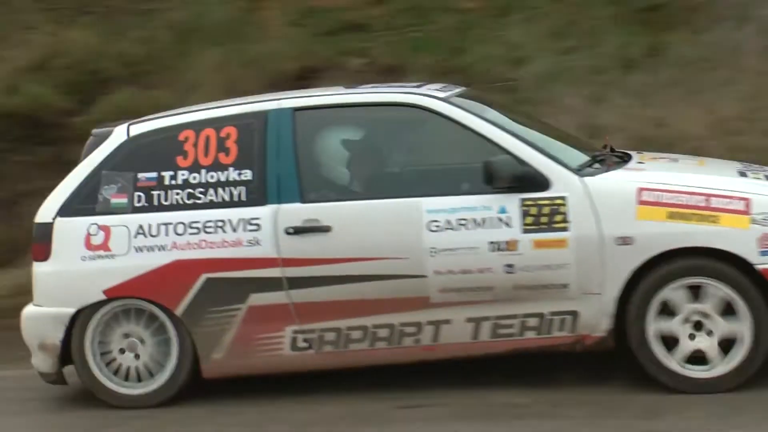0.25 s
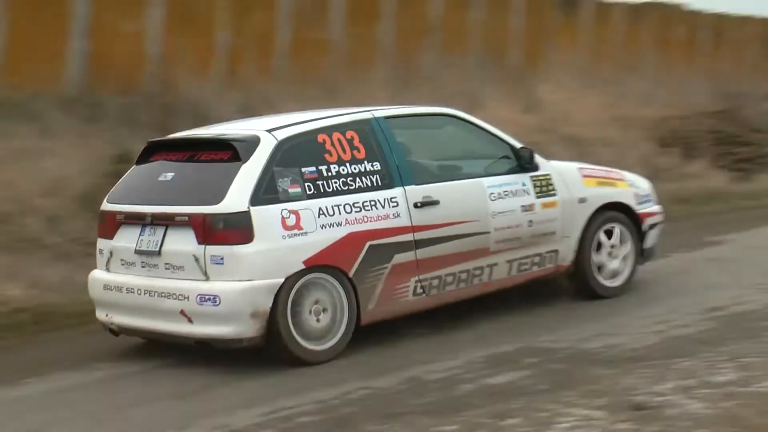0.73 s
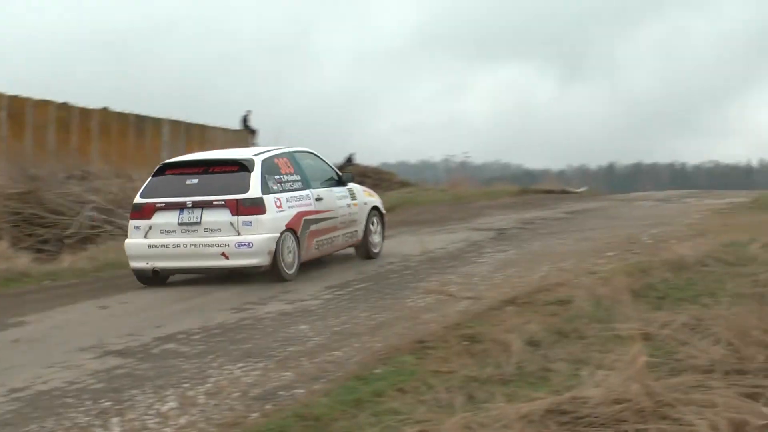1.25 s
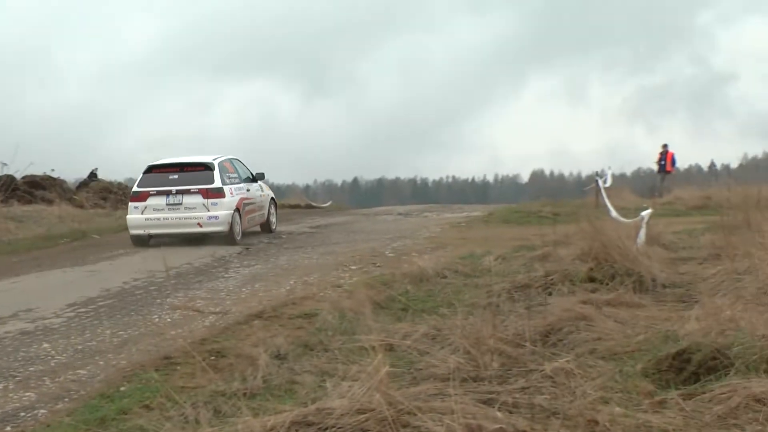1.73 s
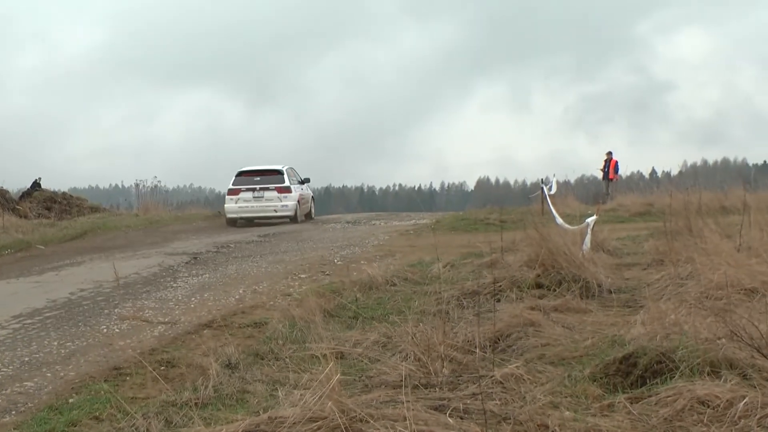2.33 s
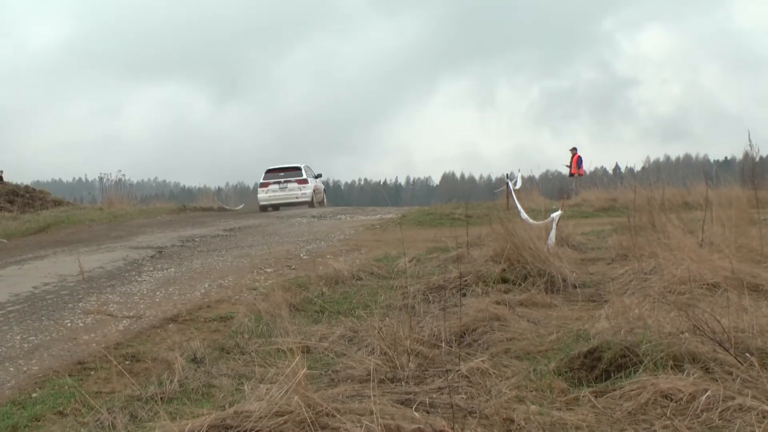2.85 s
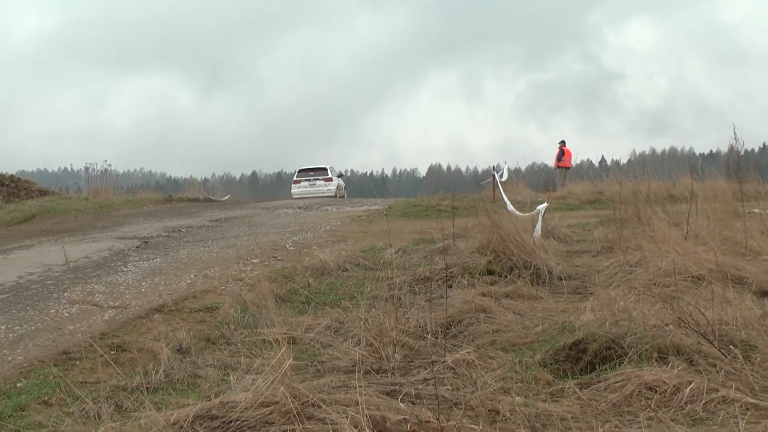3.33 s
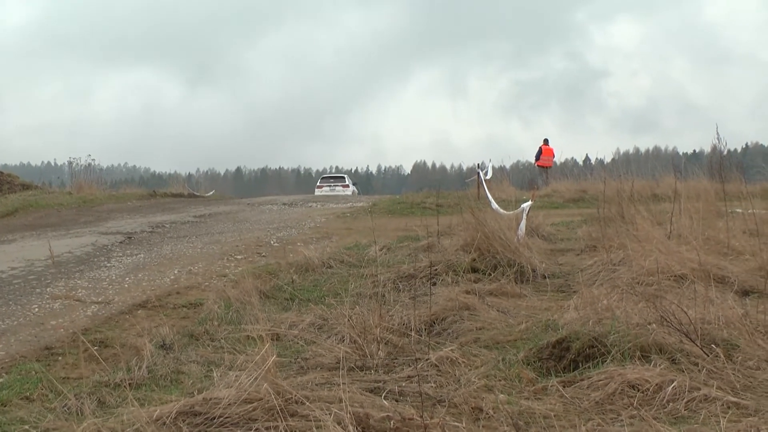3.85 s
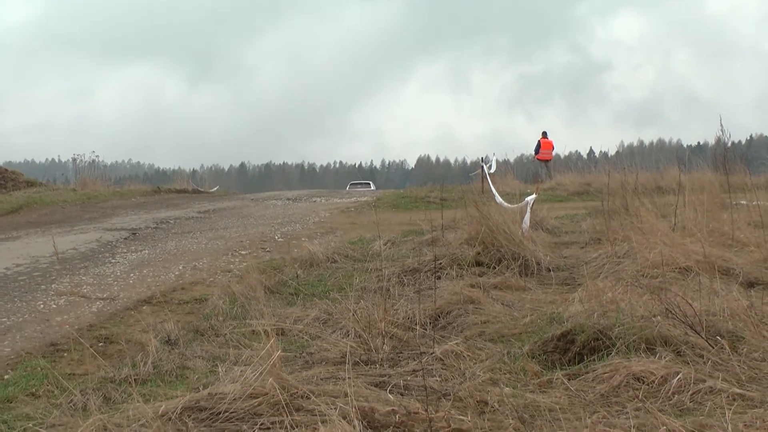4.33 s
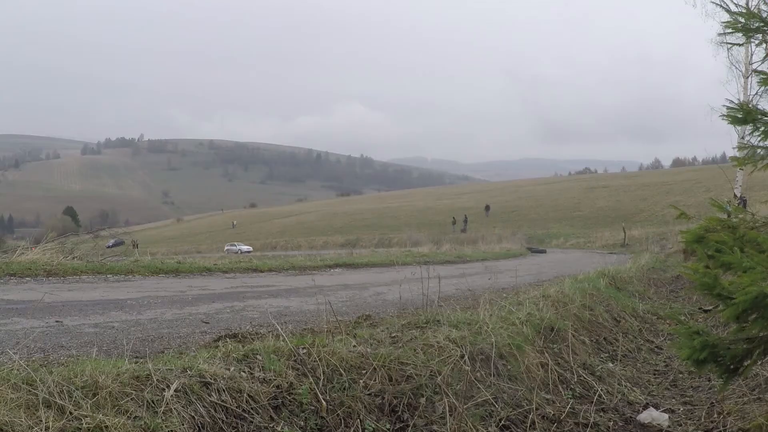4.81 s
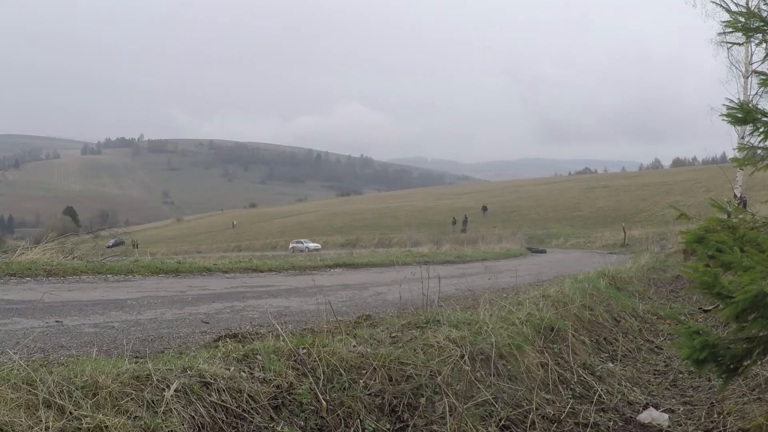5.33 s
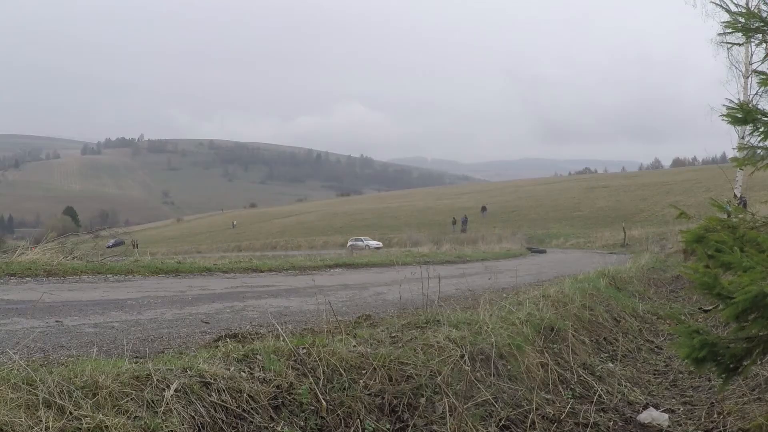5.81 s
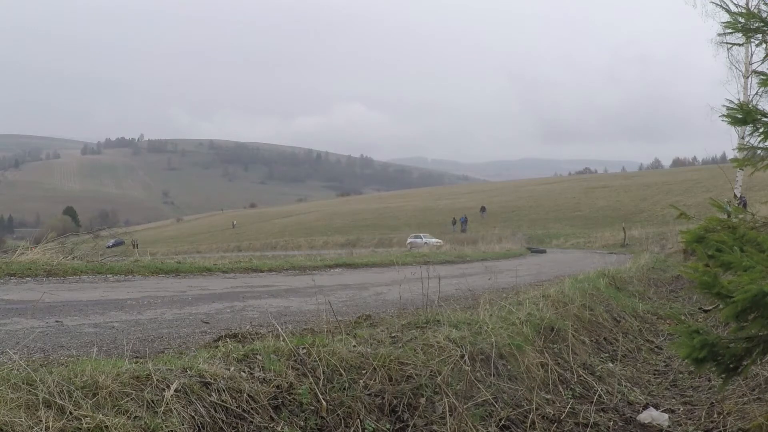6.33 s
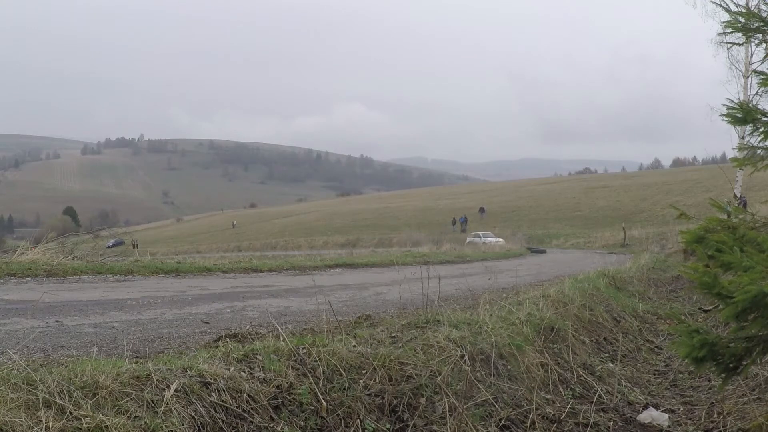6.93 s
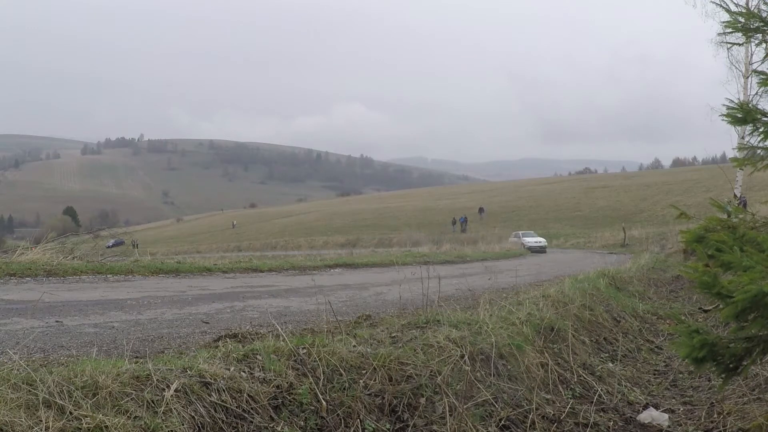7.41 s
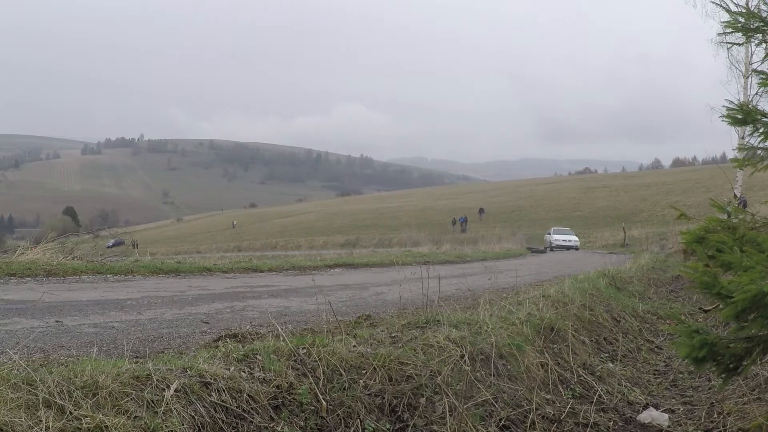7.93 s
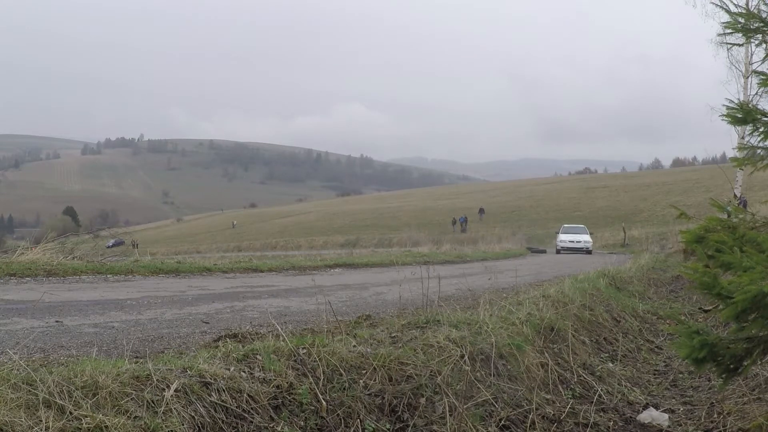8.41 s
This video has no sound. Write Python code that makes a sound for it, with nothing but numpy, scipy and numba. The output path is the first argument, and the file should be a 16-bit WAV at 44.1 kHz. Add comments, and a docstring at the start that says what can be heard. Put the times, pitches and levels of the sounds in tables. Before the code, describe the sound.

A four-cylinder rally car passes close to the roadside microphone, intake growling, exhaust barking and tyres crunching gravel. The revs climb as it pulls away, stutter in quick pops, then drop with a gearshift bang before flaring again. An abrupt cut leads to a quiet hillside, where a faint, echoing car lifts off, changes down for a bend and grows louder as it approaches under power.

```python
"""A four-cylinder rally car passes close on gravel and climbs away, pops on the limiter, shifts with a bang.
Its firings ring the exhaust into a boom, a bark and a spit of gas; the intake growls, the tyres crunch. Then,
abruptly, a quiet hillside: a far car, blurred by echoes off the slopes, lifts, whines through a bend and comes
nearer under power. A second engine hums briefly beyond the hill; the air is still, with a few dry ticks and a
faint, pulsing high whine."""
import sys
import numpy as np
from scipy import signal
from scipy.fft import rfft, irfft
from scipy.io import wavfile
from scipy.ndimage import uniform_filter1d
from numba import njit

SR = 44100
rng = np.random.default_rng(int(sys.argv[2]) if len(sys.argv) > 2 else 0)


def digitize_waveform(pressure):
    """Quantize a signal to 16-bit integers and store it at the path in sys.argv[1].

    Rows of a 2-D input are taken as channels; values are limited to [-1, 1].
    """
    field = np.atleast_2d(pressure).T
    bounded = np.clip(field, -1, 1)
    quanta = np.round(bounded * 32767).astype(np.int16)
    wavfile.write(sys.argv[1], SR, quanta)


N = 381888
T = np.arange(N) / SR
FREQS = np.maximum(np.arange(N // 2 + 1) * SR / N, 1)
SHIFT_S, HILLSIDE_S = 3.108, 4.5727  # the near car changes up; the second scene starts


def undb(db):
    """Decibels to gain."""
    return 10 ** (np.asarray(db) / 20)


def curves(rows):
    """One automation lane per column, ramping between breakpoints."""
    times, *columns = np.transpose(rows)
    return [np.interp(T, times, column) for column in columns]


def swells(rows):
    """A bell-shaped swell for each (centre [s], height, half-length [s])."""
    return sum(height * np.exp(-((T - s) / half) ** 2) for s, height, half in rows)


def unit(x):
    """Scale to rms 1."""
    return x / np.sqrt(np.mean(x ** 2))


def smooth(x, seconds):
    """Soften with two running means."""
    size = max(int(seconds * SR), 1)
    return uniform_filter1d(uniform_filter1d(x, size), size)


def steady(x):
    """Ride the slow level to 1, keeping each firing's punch."""
    return x / np.sqrt(np.abs(smooth(x ** 2, .04)) + 1e-18)


def noise():
    """White noise."""
    return rng.standard_normal(N)


def walk(rate):
    """Smooth random drift of spread near 1, with `rate` new values a second."""
    return 1.3 * smooth(np.interp(T * rate, np.arange(1000), rng.standard_normal(1000)), .5 / rate)


def place(at, size):
    """Pulses at exact times, each shared between two samples."""
    where = np.clip(at * SR, 0, N - 2)
    first = where.astype(int)
    late = where - first
    return np.bincount(first, size * (1 - late), N) + np.bincount(first + 1, size * late, N)


def band(x, lo_hz, hi_hz):
    """Steep band-pass."""
    return irfft(rfft(x) / (1 + (lo_hz / FREQS) ** 8) / (1 + (FREQS / hi_hz) ** 8), N)


def colour(x, points):
    """Minimum-phase EQ through (frequency [Hz], gain [dB]) points."""
    hz, db = np.transpose(points)
    cepstrum = irfft(np.log(undb(np.interp(np.log(FREQS), np.log(hz), db))), N)
    cepstrum[1:N // 2] *= 2
    cepstrum[N // 2 + 1:] = 0
    return irfft(rfft(x) * np.exp(rfft(cepstrum)), N)


def resonate(x, modes):
    """Resonator bank of (frequency [Hz], width [Hz], gain [dB])."""
    response = sum(undb(db) / (1 + ((FREQS - hz * hz / FREQS) / width) ** 2) for hz, width, db in modes)
    return irfft(rfft(x) * response, N)


@njit
def moving_band(x, hz, width_hz):
    """Swept state-variable band-pass."""
    out, band_state, low_state = np.empty(len(x)), 0., 0.
    for i in range(len(x)):
        tuning, damping = np.tan(np.pi * hz[i] / SR), width_hz / hz[i]
        passed = (band_state + tuning * (x[i] - low_state)) / (1 + tuning * (tuning + damping))
        band_state = 2 * passed - band_state
        low_state += 2 * tuning * passed
        out[i] = damping * passed
    return out


def smear(x, decay_s):
    """Draw transients out without changing their tone colour."""
    ring = rfft(noise() * np.exp(-T / decay_s))
    return unit(irfft(rfft(x) * ring / np.abs(ring), N))


def flutter(x, depth_db, rate):
    """Bumps and moving air make each band swell and fade by itself."""
    edges = np.r_[1, np.geomspace(400, 10000, 16), SR]
    spectrum = rfft(x)
    below = [1 / (1 + (FREQS / hz) ** 16) for hz in edges]
    bands = (irfft(spectrum * (hi - lo), N) for lo, hi in zip(below, below[1:]))
    return sum(part * undb(depth_db * walk(rate)) for part in bands)


def spread(side, width):
    """Side signal: added on the left, subtracted on the right."""
    return width * side * np.array([[1], [-1]])


# Near car's treble ducks: a slight dip while on the limiter, then two throttle lifts (start [s], end [s],
# treble gain [dB])
NEAR_LIFTS = [(2.75, 2.85, -2.5), (2.85, 2.918, -22), (3.009, 3.105, -25)]


def throttle_db(lifts=NEAR_LIFTS, seconds=0.0092):
    """The level ducks during each listed span, mostly while the throttle is shut."""
    return smooth(sum(db * ((T > start) & (T < end)) for start, end, db in lifts), seconds)


# Extra punch of each cylinder, in firing order (excess [ratio])
CYLINDERS = [0.64, 0.51, -0.0098, -0.034]
# How much of that lope is heard, most when the intake faces us (time [s], depth [ratio])
LOPE = [(0, .3), (.35, .3), (.55, .12), (.9, .1), (1.5, .06), (2.4, .14), (3.3, .07), (4.5, .08), (4.7, .2),
        (7.6, .25), (8.0, .6), (8.66, .6)]


def firings(hz, jitter_s, scatter_db, echo):
    """One pressure front per firing: returns them with pipe echo, dry, and the time since the last."""
    fired = np.cumsum(hz) / SR
    count = np.arange(1, int(fired[-1]))
    chance = rng.standard_normal((2000, 2))[count]
    at = np.interp(count, fired, T)
    # with the throttle shut the engine burns unevenly
    chance = chance * (1 - .15 * np.interp(at, T, throttle_db()))[:, None]
    excess = np.interp(at, *np.transpose(LOPE)) * np.take(CYLINDERS, count, mode="wrap")
    size = (1 + excess) * undb(scatter_db * chance[:, 0])
    # on the limiter one spark in four is cut, two firings ahead of each pop
    pop_s = np.transpose(LIMITER_POPS)[0]
    pop_slot = len(CYLINDERS) * np.arange(len(pop_s))
    limited = (at > pop_s[0]) & (at < pop_s[-1])
    slot = np.round(np.interp(at, pop_s, pop_slot))
    size[limited & (slot % len(CYLINDERS) == 2)] *= 0.15  # an unfired cylinder still pumps air
    at = np.where(limited, np.interp(slot, pop_slot, pop_s), at)
    at = np.sort(at + jitter_s * chance[:, 1])
    # the round trip changes with the heat of the gas, so the overtones keep shifting
    trip_s = 0.001357 * (1 + 0.097 * np.interp(at, T, walk(7.3)))
    fronts = place(at, size)
    age = np.abs(T - at[np.maximum(np.searchsorted(at, T) - 1, 0)])
    return fronts + echo * place(at + trip_s, size), fronts, age


# Exhaust pipe EQ (frequency [Hz], gain [dB])
PIPE_EQ = [(50, -31.5), (100, -12), (155, 1), (250, -4), (330, -9), (470, -9.5), (590, -11.5), (720, -5),
           (830, -14), (920, -23.5), (1030, -17.5), (1150, -24.5), (1450, -24.5), (1950, -26.5),
           (2600, -42.5), (6000, -48)]
# Brief dips in the boom on the climb (centre [s], gain [dB], half-length [s])
BOOM_DIPS = [(1.71, -2.5, 0.045), (1.84, -0.5, 0.045), (2.27, -1.5, .05), (2.62, -1, 0.17),
             (2.86, -5.5, .04), (3.05, -10, 0.017), (3.25, -7, 0.02), (3.72, -0.5, 0.089),
             (3.98, -2.5, .03)]
# The body's upper band against its lower (time [s], gain [dB])
BODY_TILT = [(0, -2.5), (.5, 8), (1.14, 7), (1.28, -3), (1.7, -0.5), (1.96, 0.5), (2.12, 3.5), (2.33, 5),
             (2.52, 9.5), (2.62, 7.5), (2.8, 9), (3.05, -3.5), (3.35, 0.5), (4.0, 7), (4.2, -1.5),
             (4.56, 2.5)]


def exhaust_pipe(pulses, spit, boom_db, body_db):
    """Firings ring the open pipe: a low boom, and a midrange body roughened by turbulence."""
    pipe = colour(-pulses + 0.004 * noise(), PIPE_EQ)
    boom = steady(band(pipe, 53, 270)) * undb(boom_db + 1.85 + swells(BOOM_DIPS) + 0.67 * walk(7.6))
    rough = flutter(pipe + colour(.008 * spit, PIPE_EQ), depth_db=2.8, rate=14)
    upper_db, = curves(BODY_TILT)
    body = steady(band(rough, 290, 623) + undb(upper_db) * band(rough, 784, 1170))
    return boom, body * undb(body_db)


# Bark EQ (frequency [Hz], gain [dB])
BARK_EQ = [(1200, -6), (1400, -2.5), (1650, -4.5), (2000, -6), (2250, -12), (2450, -12.5), (2750, -14),
           (3000, -14.5)]
# Notch that sweeps as the tailpipe turns and its bounce off the road changes (time [s], centre [Hz])
BARK_NOTCH = [(.08, 1100), (.22, 1880), (.4, 1690), (.55, 2390), (.75, 3030), (1.1, 3040), (1.35, 1630),
              (1.95, 1670), (2.25, 1460), (3.3, 1400), (3.9, 1450), (4.5, 1420)]


def tailpipe_bark(pulses, spit, db):
    """The thin steel tailpipe smears each steep front into a bark."""
    steel = smear(pulses, decay_s=0.0024)
    front = flutter(steel + .4 * spit + 0.33 * noise(), depth_db=5.0, rate=10)
    notch_hz = curves(BARK_NOTCH)[0] * (1 + .02 * walk(8.7))
    hollowed = front - .9 * moving_band(front, notch_hz, width_hz=620.)
    return steady(band(colour(-hollowed, BARK_EQ), 670, 2970)) * undb(db + 3.25 + 0.5 * walk(16))


# EQ of escaping gas (frequency [Hz], gain [dB])
GAS_EQ = [(900, -36), (1800, -8), (3000, -11.5), (4400, -17), (6000, -27), (8500, -32.5), (11000, -34),
          (15500, -52.5)]


def gas_rasp(fronts, spit, db):
    """Each firing ends in a bright blast of gas; the first ones in the new gear bite harder."""
    blast = flutter(unit(fronts) + .6 * spit + .2 * noise(), depth_db=5.0, rate=17)
    bite_db = 10 * (T > SHIFT_S) * np.exp(-np.abs(T - SHIFT_S) / .018)
    return steady(band(colour(blast, GAS_EQ), 2970, 11000)) * undb(db + bite_db + 1.76 + 0.59 * walk(25))


# Swells of exhaust sizzle (centre [s], half-length [s], frequency [Hz], width [Hz], level [dB])
SIZZLES = [(0.58, 0.11, 4400, 1430, -38), (0.668, 0.046, 6000, 3020, -45.5), (0.81, 0.039, 2190, 450, -35),
           (0.76, 0.039, 7700, 2800, -46), (0.844, 0.029, 7900, 3995, -43), (.99, 0.016, 6800, 3000, -43.5),
           (1.16, 0.049, 2250, 350, -39.5), (1.802, .05, 1990, 218, -38), (1.555, 0.096, 2520, 400, -40.5),
           (2.075, 0.056, 3560, 1210, -43), (2.324, 0.087, 1930, 230, -41), (2.325, 0.013, 7900, 2500, -56),
           (2.395, .02, 7000, 3540, -55), (2.96, 0.031, 4000, 1190, -53), (2.961, 0.02, 8040, 1710, -55),
           (3.131, 0.036, 1910, 400, -40.5), (3.406, .04, 4200, 1300, -45), (3.46, 0.02, 7300, 1790, -52),
           (3.55, 0.082, 1990, 280, -42.5), (3.605, 0.029, 7850, 2410, -50.5),
           (3.66, 0.067, 3940, 1200, -45), (3.79, 0.042, 2700, 500, -46)]


def exhaust_sizzle(fronts, spit):
    """Single treble bands of the firings flare up briefly."""
    crisp = unit(fronts) + .45 * spit
    return sum(unit(resonate(crisp, [(hz, width, 0)])) * swells([(s, undb(db), half)])
               for s, half, hz, width, db in SIZZLES)


# Faders for the pass-by, nose then tailpipe (time [s], boom [dB], body [dB], bark [dB], gas [dB])
PASS_BY = [(0.0, -14.5, -29.5, -37, -44), (0.122, -17, -25.5, -39.5, -49), (0.284, -16, -25.5, -38.5, -53),
           (0.384, -21, -24, -32.5, -44.5), (0.448, -17.5, -22.5, -31.5, -48),
           (0.576, -18.5, -23.5, -42, -45.5), (0.74, -25.5, -23, -33, -43.5),
           (0.902, -20.5, -22, -33.5, -43), (1.33, -20, -27.5, -40.5, -49)]
# Faders for the climb; rows are boom, body, bark, gas
# (start level [dB], slope [dB/s], gain with rev flare [dB/Hz], offset in the high gear [dB])
CLIMB = [(-19, 0, 0.09, -0.4), (-25, -0.52, 0.08, 3.5), (-41.5, 1.5, 0.35, -4), (-52.5, -1.5, 0.36, -2)]


def near_levels(flare_hz, climb_s=1.1, crossfade_s=0.17):
    """The pass-by crossfades into the climb, which brightens with every rev flare."""
    climbing = np.clip((T - climb_s) / crossfade_s, 0, 1)
    away = [db + slope * (T - climb_s) + per_hz * flare_hz + gear_db * (T > SHIFT_S)
            for db, slope, per_hz, gear_db in CLIMB]
    return [passing + climbing * (leaving - passing) for passing, leaving in zip(curves(PASS_BY), away)]


# Near revs with the tyres gripping: build, change up, pull again (time [s], firing rate [Hz])
NEAR_REVS = [(0.0, 162.6), (0.124, 155.9), (0.314, 161), (0.65, 161.5), (0.966, 166.2), (1.1, 169.8),
             (1.5, 180.1), (1.65, 181.1), (1.93, 187.8), (2.25, 197.3), (2.55, 205.9), (2.71, 217.5),
             (2.85, 209.8), (2.93, 192.9), (3.12, 182.1), (3.23, 163.6), (3.36, 144.6), (3.55, 146.6),
             (3.72, 144), (3.97, 141.6), (4.25, 156), (4.56, 161.4)]
# Rev flares as the wheels slip on bumps (centre [s], rise in firing rate [Hz], half-length [s])
NEAR_FLARES = [(0.478, 4.3, 0.107), (0.779, 5.342, 0.078), (1.755, 9.379, 0.064), (2.12, 11.22, 0.071),
               (2.414, 4.998, 0.038), (3.286, 4.966, 0.02), (3.644, 9.126, 0.051), (3.785, 7.195, 0.036),
               (3.878, 15.3, 0.066), (4.06, 12.5, 0.06)]


def near_car():
    """One train of firings drives every exhaust layer; a shut throttle ducks the treble most."""
    flare_hz, shut_db = swells(NEAR_FLARES), throttle_db()
    hz = (curves(NEAR_REVS)[0] + flare_hz) * (1 + .002 * walk(30))
    boom_db, body_db, bark_db, gas_db = near_levels(flare_hz)
    pulses, fronts, age = firings(hz, jitter_s=.000016, scatter_db=0.51, echo=0.13)
    spit = unit((np.exp(-age / .0006) + .07) * noise())
    boom, body = exhaust_pipe(pulses, spit, boom_db + .11 * shut_db, body_db + .26 * shut_db)
    bark = tailpipe_bark(pulses, spit, bark_db + .6 * shut_db)
    gas = gas_rasp(fronts, spit, gas_db) + exhaust_sizzle(fronts, spit)
    treble = bark + undb(shut_db) * gas
    return boom + body + treble + spread(boom, -0.013) + spread(treble, .05)


# Intake pipe resonances (frequency [Hz], width [Hz], gain [dB])
INTAKE_MODES = [(209, 52, 5.5), (453, 38, -2.5), (567, 120, 1.5), (890, 85, -11)]


def intake():
    """The intake gulps once in four firings, growling until the bonnet has gone by."""
    facing = .5 - .5 * np.tanh((T - 0.36) / 0.18)
    cycles = np.cumsum(curves(NEAR_REVS)[0] + swells(NEAR_FLARES)) / SR / len(CYLINDERS)
    at = np.interp(np.arange(int(cycles[-1])), cycles, T)
    gulps = place(at, undb(1.4 * np.interp(at, T, walk(35))))
    growl = smear(gulps, decay_s=0.018) + 0.29 * noise()  # the airbox draws each gulp out
    return unit(resonate(growl, INTAKE_MODES)) * undb(-25) * facing


# Ring of the thrown stones (frequency [Hz], width [Hz], level [dB])
STONE_MODES = [(3430, 610, 1.5), (4500, 600, -2), (5400, 900, -2), (8400, 1400, -14)]


def thrown_stones(hits_per_s=80, bunching_db=7):
    """Stones flicked up by the tyres knock together in short gritty bursts."""
    burst = undb(bunching_db * walk(22))
    out = 0
    for hz, width, db in STONE_MODES:
        hits = (rng.random(N) < hits_per_s / len(STONE_MODES) / SR) * noise()
        knocks = unit(resonate(hits * burst, [(hz, width, 0)])) * undb(db)
        out = out + knocks * (1 + spread(walk(30), .3))
    return unit(out)


# EQ of crunching gravel (frequency [Hz], gain [dB])
CRUNCH_EQ = [(1200, -18.5), (2500, -2), (4200, -2), (6000, -9), (9000, -13.5), (12000, -23), (15500, -38.5)]


def crunch(spray):
    """Loose stones under the tread: dense grains of uneven size."""
    grains = spray * noise() * (rng.random(N) < .05)
    size_db = 2 * np.minimum(rng.exponential(size=N), 6)
    return unit(colour(grains * undb(size_db), CRUNCH_EQ))


# Fader for the tyres on loose stones (time [s], level [dB])
GRAVEL_LEVEL = [(0, -40), (.25, -51.5), (.45, -46), (.6, -48.5), (.85, -49.5), (1.1, -50), (1.5, -48),
                (1.95, -51), (2.5, -48.5), (3.05, -59.5), (3.25, -52.5), (3.5, -51.5), (4.5, -54)]


def gravel():
    """Tyres crunch, roar and throw stones over a low road rumble."""
    db, = curves(GRAVEL_LEVEL)
    spray = undb(2 * walk(25))
    mid, side = crunch(spray), crunch(spray)
    roar, roar_side = (unit(band(noise(), 650, 2100)) for _ in range(2))
    rumble = unit(band(noise(), 22, 140)) * undb(-56.5)
    stones = mid + spread(side, 0.41) + spread(mid, .2) + undb(-13.5) * thrown_stones()
    rolling = undb(-5) * (roar + spread(roar_side, .6) + spread(roar, .3))
    return (stones + rolling) * undb(db) + rumble


# On the limiter, unburnt fuel pops in the pipe once per engine cycle (time [s], push level [dB])
LIMITER_POPS = [(2.7343, -9.5), (2.7532, -11), (2.772, -15.5), (2.7907, -9.5), (2.8092, -19), (2.8281, -14),
                (2.849, -21), (2.866, -20), (2.886, -29)]
# Ring of the pipe after an explosion (frequency [Hz], gain [dB])
THUD_EQ = [(30, -24), (70, -8.5), (92, 8), (108, 15.5), (130, 7), (170, 4), (260, -4.5), (390, 6.5),
           (490, 6), (620, 6.5), (750, 10.5), (860, -6), (1030, 3), (1450, -11.5), (4000, -21)]


def backfires(churn_s=.012, snap_s=0.00066, tail_s=0.011):
    """Limiter pops and the gearshift bang: each shoves the gas column into a thud, with a crack on top."""
    shove, cracks = np.zeros(N), np.zeros(N)
    # (time [s], push level [dB], push length [s], crack level [dB])
    pops = [(s, db, 0.00022, db - 29) for s, db in LIMITER_POPS]
    bang = (SHIFT_S, -8.5, 0.00014, -13)
    for s, db, push_s, crack_db in pops + [bang]:
        start = int(s * SR)
        age = T[:N - start]
        push = age / push_s * np.exp(1 - age / push_s)
        churn = .05 * noise()[start:] * np.exp(-age / churn_s)
        shove[start:] += undb(db) * (push + churn)
        cracks[start:] += undb(crack_db) * (np.exp(-age / snap_s) + 0.51 * np.exp(-age / tail_s))
    return colour(-shove, THUD_EQ) + colour(cracks * noise(), GAS_EQ)


# Small clicks (time [s], peak [dB], frequency [Hz], width [Hz], decay [s])
TICKS = [(4.5726, -23.5, 7060, 13950, 0.00026), (5.753, -59, 6540, 2465, .001),
         (6.356, -59, 5970, 3080, .001), (6.664, -43, 5800, 2620, 0.0013), (6.957, -49, 1380, 620, 0.0035),
         (7.265, -53, 6000, 3000, 0.0009), (7.554, -56, 5980, 2930, .001)]


def ticks():
    """Dry clicks of band-passed noise; the loudest opens the hillside scene."""
    out = 0
    for s, db, hz, width, decay in TICKS:
        reach = 1 + 0.56 * width / hz
        click = band(noise() * (T > s) * np.exp(-np.abs(T - s) / decay), hz / reach, hz * reach)
        out = out + undb(db) * click / np.abs(click).max()
    return out


# EQ of the open-air bed (frequency [Hz], gain [dB])
AIR_EQ = [(15, -32), (25, 5), (91, -5.5), (152, -4.5), (253, -17.5), (1710, -23.5), (2360, -16),
          (5140, -24), (7300, -30.5), (8580, -32), (9300, -33), (13500, -34), (15500, -51)]


def hillside():
    """Still open air, and a thin high whine pulsing fifty times a second."""
    air = unit(colour(noise(), AIR_EQ)) * undb(-62.5 + walk(4.41))
    gate = smooth(1. * (T * 50 % 1 < .28), .001)
    whine = unit(gate * np.sin(2 * np.pi * 8550 * T)) * undb(-80.5)
    return air + whine + spread(noise(), undb(-95))


# Far revs with the tyres gripping: lift, change down for the bend, pull out (time [s], firing rate [Hz])
FAR_REVS = [(4.57, 180.6), (4.85, 190.5), (5.05, 183.8), (5.2, 162), (5.4, 151), (5.66, 152), (5.86, 213),
            (6.3, 184.2), (6.65, 169.6), (6.97, 174.5), (7.3, 180.8), (7.8, 183.6), (8.3, 188),
            (8.66, 188.8)]
# Rev flares as its wheels slip (centre [s], rise in firing rate [Hz], half-length [s])
FAR_FLARES = [(6.83, 8.1, 0.083), (7.14, 11.2, 0.066), (7.55, 7.2, 0.059), (8.02, 9.6, 0.062),
              (8.17, 26, 0.045), (8.46, 26.7, 0.099)]
# Faders under power, much louder once the car faces us (time [s], body [dB], rasp [dB])
FAR_POWER = [(4.6, -92, -58.5), (4.95, -93, -56), (5.85, -91, -64.5), (6.4, -93, -65), (6.75, -76.5, -67.5),
             (7.02, -72, -59.5), (7.18, -73.5, -59), (7.3, -64, -59.5), (7.7, -64, -58.5),
             (7.8, -64, -57.5), (7.95, -58, -47.5), (8.66, -54.5, -46.5)]
# Far car off the throttle (start [s], end [s], gain [dB])
FAR_LIFTS = [(5.06, 5.74, -25.5), (6.42, 6.72, -28)]
# Fader for its exhaust boom (time [s], level [dB])
FAR_BOOM = [(4.6, -57), (5.0, -63.5), (5.2, -67.5), (5.7, -66), (5.9, -62), (6.65, -70), (6.9, -62.5),
            (7.3, -59.5), (7.9, -59.5), (8.08, -72), (8.4, -56.5), (8.66, -57)]
# Turbulence in its body and rasp (time [s], noise amount [ratio])
FAR_TURBULENCE = [(4.6, 0.59), (7.7, 1), (8.0, 1.0)]
# Resonances of its rasp (frequency [Hz], width [Hz], gain [dB])
RASP_MODES = [(1000, 1060, -10.5), (1070, 110, -8), (1284, 50, -14), (1583, 91, -4.5), (2037, 280, 4),
              (2410, 320, 7.5), (2890, 130, 3), (3530, 110, 0), (3824, 214, -3), (4326, 180, -8),
              (4760, 270, -6), (5150, 230, -5)]
# A narrow notch across the whole far car (frequency [Hz], gain [dB])
FAR_EQ = [(2980, 0), (3120, -8), (3260, -15), (3420, 2.5)]
# EQ of its pipe body (frequency [Hz], gain [dB])
FAR_BODY_EQ = [(280, -6.5), (365, 3.5), (470, 3.5), (560, -1.5), (660, -7), (780, -10), (950, -4),
               (1100, -9.5), (1600, -10)]


def far_car(echo_db=1, echo_decay_s=0.11):
    """Distant firings, blurred by echoes off the slopes, make a pure boom, a body and a rasp."""
    hz = (curves(FAR_REVS)[0] + swells(FAR_FLARES)) * (1 + .004 * walk(20))
    body_db, rasp_db = curves(FAR_POWER) + throttle_db(FAR_LIFTS, seconds=0.09)
    boom_db, = curves(FAR_BOOM)
    turbulence, = curves(FAR_TURBULENCE)
    pulses, _, _ = firings(hz, jitter_s=.00002, scatter_db=.8, echo=.15)
    slopes = noise() * np.exp(-T / echo_decay_s)
    echoes = irfft(rfft(pulses) * rfft(slopes), N)
    blurred = unit(pulses - pulses.mean()) + undb(echo_db) * unit(band(echoes, 100, 14000))
    boom = steady(band(band(blurred, 115, 235), 115, 235)) * undb(boom_db)
    wavering = unit(flutter(blurred, depth_db=3.6, rate=16))
    pipe = colour(wavering + 0.62 * turbulence * noise(), FAR_BODY_EQ)
    body = steady(band(pipe, 206.6, 1250)) * undb(body_db)
    rasp = steady(resonate(wavering + turbulence * noise(), RASP_MODES)) * undb(rasp_db)
    tyres = far_tyres()
    rumble = unit(band(noise(), 25, 107)) * undb(rasp_db - 16.5)
    return colour(boom + body + rasp + tyres + rumble, FAR_EQ)


# Thin whines from the far car in the bend (centre [s], half-length [s], top pitch [Hz], level [dB])
BEND_WHINES = [(6.131, 0.23, 887, -69), (7.35, 0.12, 855, -68)]


def bend_whine(sag_hz=28):
    """Wavering tones with a few overtones; each swells and arches in pitch."""
    out = 0
    for s, half, top_hz, db in BEND_WHINES:
        arch = np.minimum(((T - s) / half) ** 2, 9)
        hz = (top_hz - sag_hz * arch) * (1 + 0.00433 * walk(50))
        phase = 2 * np.pi * np.cumsum(hz) / SR
        tone = np.sin(phase) + .7 * np.sin(2 * phase) + .7 * np.sin(2.5 * phase) + .25 * np.sin(4 * phase)
        out = out + unit(tone) * undb(db) * np.exp(-arch ** 2 / 2)
    return out


# A second engine running down (time [s], firing rate [Hz], level [dB])
OTHER_CAR = [(5.9, 203, -110), (6.05, 183.4, -74), (6.25, 163.8, -70.5), (6.55, 147.2, -65.5),
             (6.7, 147.5, -110)]


def other_car():
    """An engine beyond the hill: only its lowest note carries this far."""
    hz, db = curves(OTHER_CAR)
    return unit(np.sin(2 * np.pi * np.cumsum(hz) / SR)) * undb(db)


# Fader for the far car's tyres (time [s], level [dB])
FAR_TYRE_LEVEL = [(7.0, -102), (7.8, -72), (7.9, -61.5), (8.2, -60.5), (8.66, -58.5)]
# Peaks in their hiss (frequency [Hz], width [Hz], gain [dB])
HISS_MODES = [(2250, 460, -6.5), (3670, 200, -1.0), (4400, 250, -10), (4810, 300, -0.5),
              (4930, 180, -2), (6900, 1000, -7.0), (9700, 1200, -27)]


def far_tyres():
    """Tyre hiss rises as the far car comes out of the bend."""
    db, = curves(FAR_TYRE_LEVEL)
    return unit(resonate(noise(), HISS_MODES)) * undb(db)


def scene():
    """The close pass, then at once the distant approach."""
    close = near_car() + intake() + backfires() + gravel()
    distant = far_car() + other_car() + bend_whine() + hillside()
    return np.where(T < HILLSIDE_S, close, distant) + ticks()


def record(dry):
    """A steep low-pass takes off the very top."""
    return signal.sosfilt(signal.ellip(8, .2, 70, 15750, fs=SR, output="sos"), dry)


dry = scene()
out = record(dry)
digitize_waveform(out)
```